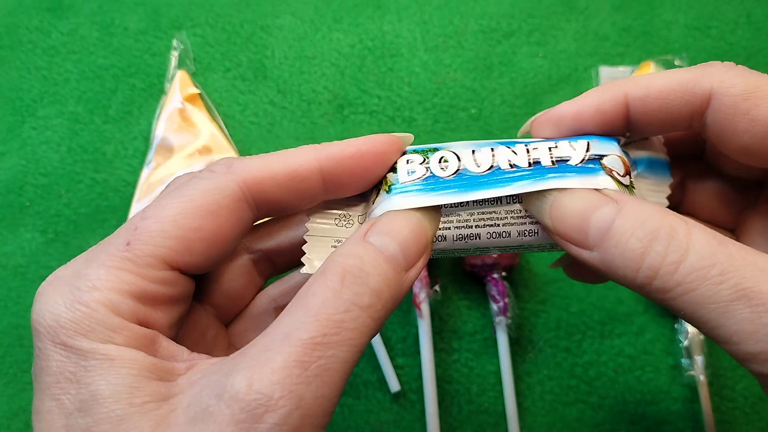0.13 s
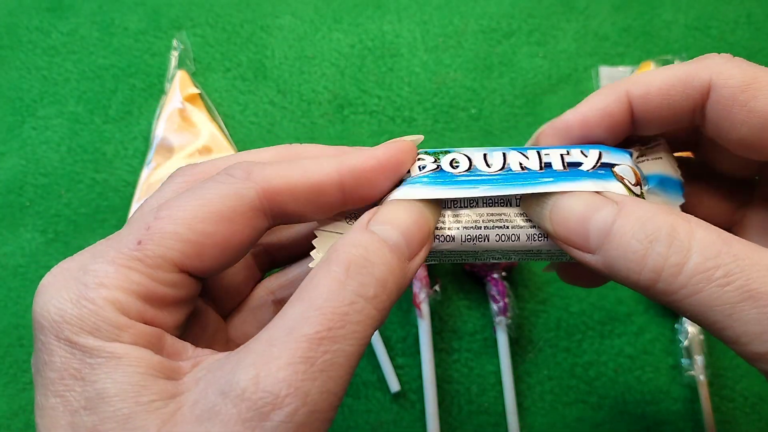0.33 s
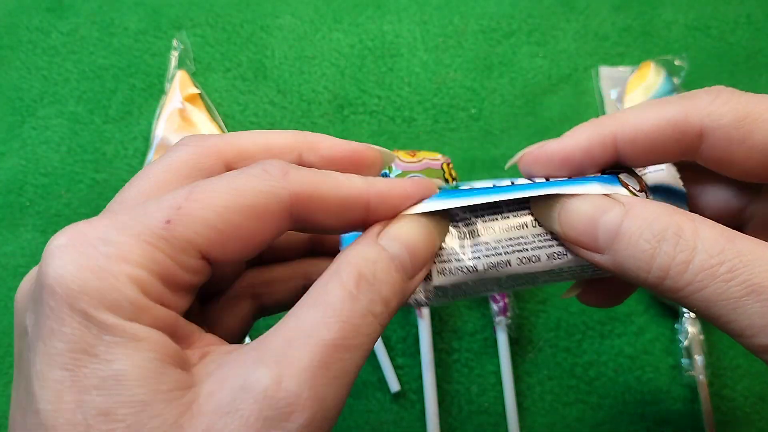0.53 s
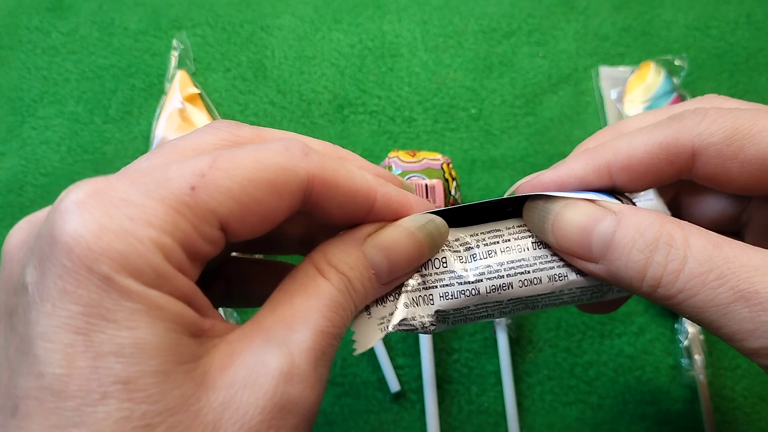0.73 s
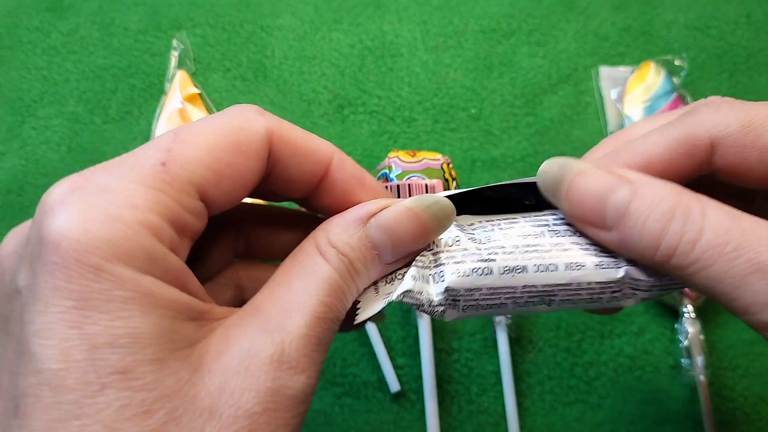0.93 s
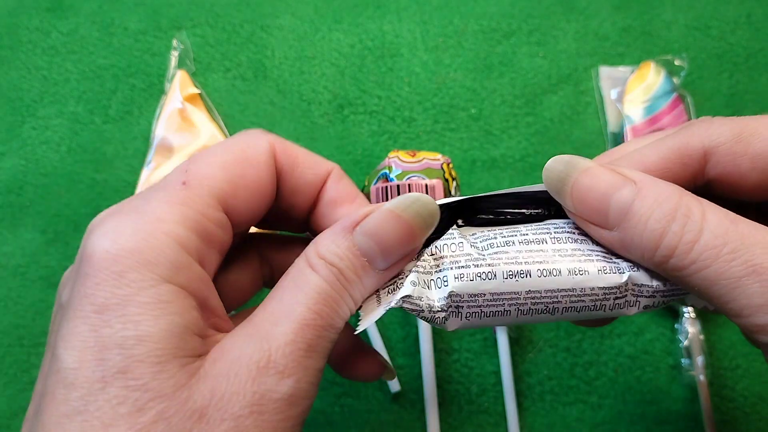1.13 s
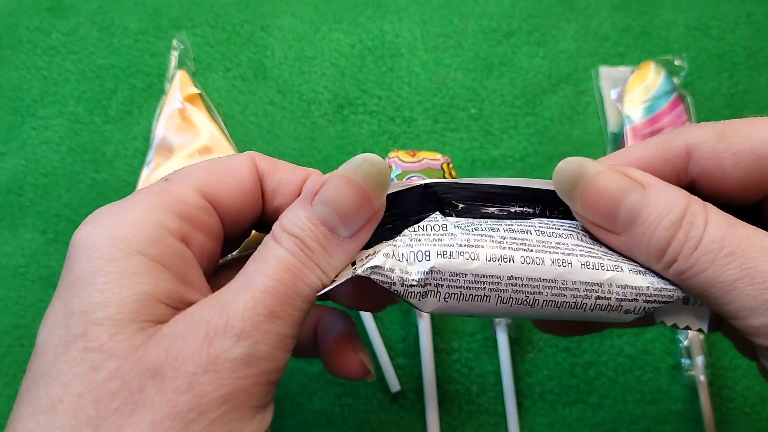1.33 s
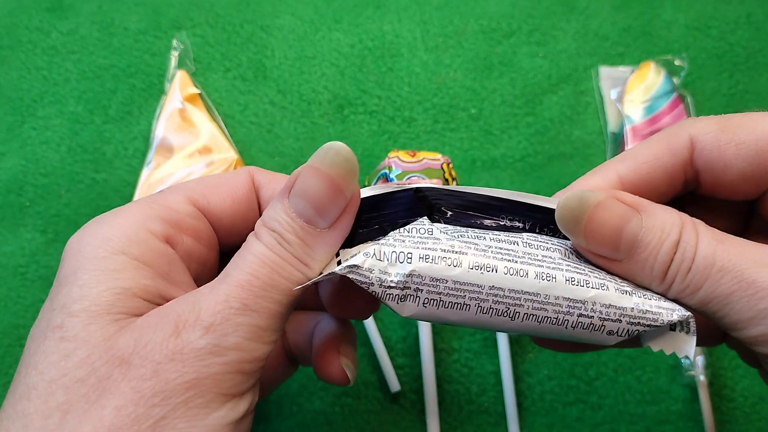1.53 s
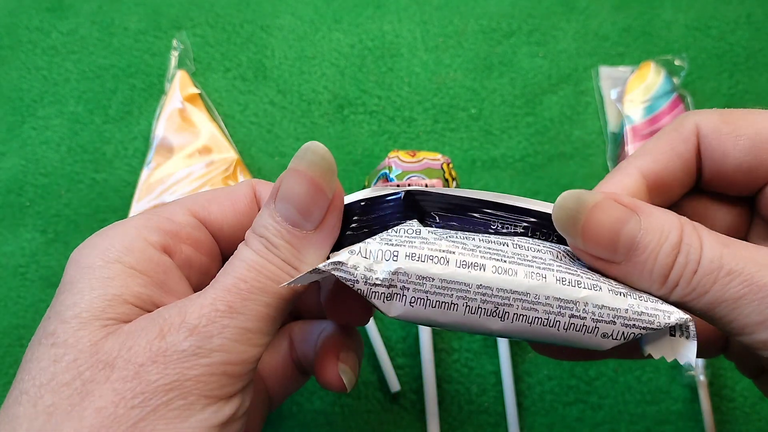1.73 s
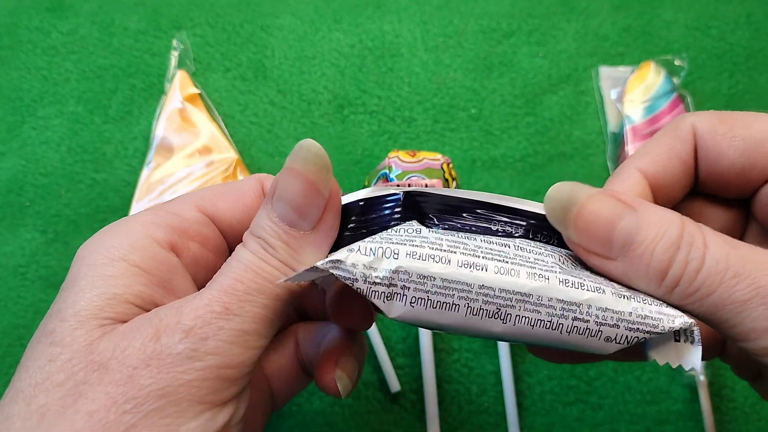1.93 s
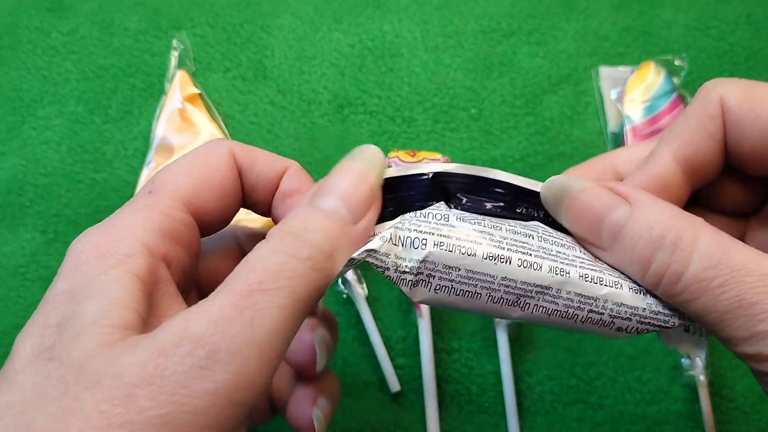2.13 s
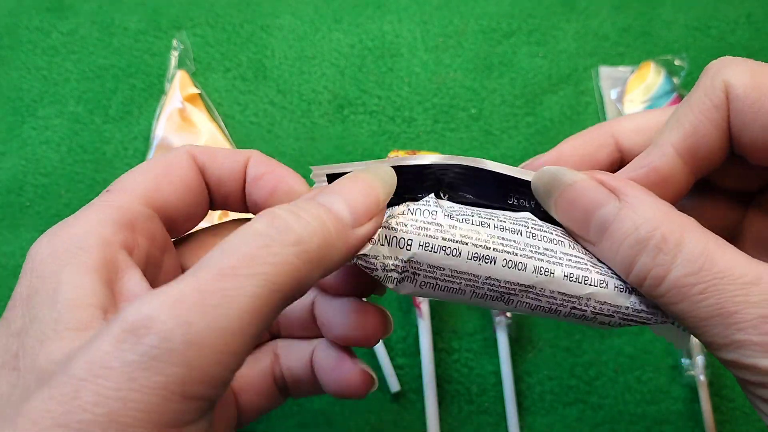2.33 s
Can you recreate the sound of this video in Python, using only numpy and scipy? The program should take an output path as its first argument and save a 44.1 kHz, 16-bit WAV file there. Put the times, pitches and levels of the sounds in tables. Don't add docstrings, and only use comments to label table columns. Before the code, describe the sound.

Close stereo crinkling of a plastic sweet wrapper: scattered crisp clicks, a thick burst of bright crackles, looser smoothing snaps, a short lull, then renewed rustling with dull film knocks, in a quiet, barely reverberant room.

```python
import sys
import numpy as np
from scipy import signal
from scipy.fft import rfft, irfft, next_fast_len
from scipy.io import wavfile
from scipy.ndimage import uniform_filter1d

SR = 44100
rng = np.random.default_rng(int(sys.argv[2]) if len(sys.argv) > 2 else 0)


def invert_db(level):
    return 10 ** (np.asarray(level, dtype=float) / 20)


def pcm_store(signal):
    levels = np.round(np.clip(np.atleast_2d(signal), -1, 1) * 32767)
    wavfile.write(sys.argv[1], SR, levels.astype(np.int16).T)


N = 110250
TIME_S = np.arange(N) / SR
SIDE = np.array([[0.5], [-0.5]])


def at_hz(points, hz):
    table_hz, table_db = np.transpose(points)
    return np.interp(np.log(hz + 1), np.log(table_hz), table_db)


def rms_one(x):
    return x / np.sqrt(np.mean(x ** 2) + 1e-20)


def drift(rate_hz):
    r = np.exp(-2 * np.pi * rate_hz / SR)
    wander = signal.lfilter([1], [1, -2 * r, r * r], rng.standard_normal(N + SR))
    return rms_one(wander[SR:])


HUM_HZ, HUM_DB, HUM_PAN_DB, HUM_WOBBLE_DB = 100, -82.5, 6, 1
HUM_SINKS_S, SINK_DB = 1.75, -3.5


def mains_hum():
    level_db = HUM_DB + SINK_DB * (TIME_S > HUM_SINKS_S) + HUM_WOBBLE_DB * drift(11.0)
    hum = np.sqrt(2) * np.sin(2 * np.pi * HUM_HZ * TIME_S) * invert_db(level_db)
    return invert_db(HUM_PAN_DB * SIDE) * hum


# (frequency [Hz], level [dB per Hz])
HISS_COLOUR = [(25, 3.5), (60, 0.5), (200, 9), (450, 6.5), (900, 4.5), (2900, -36), (7000, 2), (12000, -29)]
HISS_DB, HISS_PAN_DB = -81, 1
LULL_S, LULL_HALF_S = 1.88, 0.13


def hiss():
    colour = invert_db(at_hz(HISS_COLOUR, np.fft.rfftfreq(N, 1 / SR)))
    noise = irfft(rfft(rng.standard_normal((2, N))) * colour, N)
    lull = np.abs(TIME_S - LULL_S) < LULL_HALF_S
    return invert_db(HISS_DB + SINK_DB * lull + HISS_PAN_DB * SIDE) * rms_one(noise)


# (frequency [Hz], lift [dB])
HOLLOW_LIFTS = [(1150, 3), (1800, 4), (2550, 6), (4000, 6.5), (5800, 2.5), (7050, 3.5)]
# (frequency [Hz], level [dB])
LEFT_COLOUR = [(600, -19.5), (850, -10), (2600, -2), (4500, 0), (7000, -1.5), (9000, -13.5), (10000, -21.5),
               (16000, -30)]
# (frequency [Hz], level [dB])
RIGHT_COLOUR = [(600, -17.5), (850, -6), (2600, 0), (5500, 6), (7100, 9), (8800, -9.5), (10500, -26.5),
                (15300, -20)]
HOLLOW_WIDTH_HZ = 180


def microphones(size):
    hz = np.fft.rfftfreq(size, 1 / SR)
    lift = sum(db / (1 + ((hz - centre_hz) / HOLLOW_WIDTH_HZ) ** 2) for centre_hz, db in HOLLOW_LIFTS)
    spectra = []
    for colour in (LEFT_COLOUR, RIGHT_COLOUR):
        cepstrum = irfft(np.log(invert_db(at_hz(colour, hz) + lift)), size)
        cepstrum[1:size // 2] *= 2
        cepstrum[size // 2 + 1:] = 0
        spectra.append(np.exp(rfft(cepstrum)))
    return np.array(spectra)


# (time [s], level [dB])
FINGER_PRESSURE = [(0, -65), (0.272, -61), (.36, -78.5), (.43, -70), (.52, -64), (.7, -56.5), (1.0, -56.5),
                   (1.121, -67.5), (1.25, -63.5), (1.48, -54.5), (1.56, -65.5), (1.82, -75.5), (1.98, -93),
                   (2.081, -60.5), (2.179, -47.5), (2.29, -61.5), (2.379, -58), (2.439, -65)]
CRACKLES_PER_S, CRACKLE_SPREAD_DB, CRACKLE_CYCLES = 4000, 3.8, 3.7
RUSTLE_DB, CLUMP_DB = -2, 3


def rustle(count=16):
    s, db = np.transpose(FINGER_PRESSURE)
    sizes_db = CRACKLE_SPREAD_DB * np.minimum(rng.exponential(1, N), 5)
    sizes = invert_db(sizes_db) * rng.choice([-1, 1], N)
    born = rng.random(N) < CRACKLES_PER_S * invert_db(CLUMP_DB * drift(25)) / SR
    pitch_number = rng.integers(0, count, N)
    out = np.zeros((2, N))
    for k, hz in enumerate(np.geomspace(900, 15000, count)):
        r = invert_db(-60 * hz / CRACKLE_CYCLES / SR)
        w = 2 * np.pi * hz / SR
        clicks = sizes * born * (pitch_number == k) + 1e-18
        ring = signal.lfilter([1, 0, -1], [1, -2 * r * np.cos(w), r * r], clicks)
        lag = rng.integers(-20, 20)
        out += np.array([ring, np.roll(ring, lag)]) * np.sqrt(hz / 4000)
    size = next_fast_len(N + 2048)
    out = irfft(rfft(out, size) * microphones(size), size)[:, :N]
    return rms_one(out) * invert_db(np.interp(TIME_S, s, db) + RUSTLE_DB)


SLIP_RISE_S, SLIP_FALL_S, LEAD_CLICK_DB = 0.00045, 0.00045, 4
SNAP_ALIKE, EVEN_FLOOR = 0.68, 0.11
PAN_SPREAD_DB, LAG_SPREAD_S = 1.5, 0.00015
RING_Q, BRIGHT_HZ = 4.6, 6214


def slip_bursts(count, slower, size):
    t = np.arange(size) / SR - 0.004
    shape = np.where(t < 0, np.exp(t / SLIP_RISE_S / slower), np.exp(-t / SLIP_FALL_S / slower))
    click = invert_db(LEAD_CLICK_DB) * (np.abs(t) == np.abs(t).min())
    slips = rng.standard_normal((count, 2, 3, size)) * shape
    slips += click * rng.choice([-1, 1], (count, 2, 1, 1))
    shared, own = slips[:, :, :1], slips[:, :, 1:]
    burst = rfft(np.sqrt(SNAP_ALIKE) * shared + np.sqrt(1 - SNAP_ALIKE) * own)
    strength = np.abs(burst) ** 2
    burst = burst / np.sqrt(strength + EVEN_FLOOR * strength.mean(axis=-1, keepdims=True))
    return rfft(irfft(burst, size) * np.sqrt(shape))


def snaps(rows, skirt_db, slower=1, size=1024):
    s, db, ring_hz, bright_db = np.transpose(rows)
    hz = np.fft.rfftfreq(size, 1 / SR)
    bursts = slip_bursts(len(s), slower, size)
    pan, lag = rng.standard_normal((2, len(s), 1, 1))
    place = invert_db(PAN_SPREAD_DB * pan * SIDE) * np.exp(-2j * np.pi * hz * LAG_SPREAD_S * lag * SIDE)
    u = 1j * hz / ring_hz[:, None, None]
    v = 1j * hz / BRIGHT_HZ
    body = u / RING_Q / (1 + u / RING_Q + u * u)
    skirt = invert_db(skirt_db) * (1.5 * u / (1 + 1.5 * u)) ** 3
    ring = (body + skirt) / (1 + 1.9 * v + v * v) ** 2
    edge = (v * v / (1 + 1.455 * v + v * v)) ** 2
    out = np.zeros((2, N + size))
    for part, colour, level_db in ((0, ring, db), (1, edge, db + bright_db)):
        x = irfft(bursts[:, part] * colour * place * microphones(size), size)
        power = uniform_filter1d(np.mean(x ** 2, axis=1), size=33)
        x = x * (invert_db(level_db + 0.5) / np.sqrt(power.max(axis=1)))[:, None, None]
        starts = np.maximum(s * SR - power.argmax(axis=1), 0).astype(int)
        for start, one in zip(starts, x):
            out[:, start:start + size] += one
    return out[:, :N]


# (time [s], body ring level [dB], ring
# pitch [Hz], bright part above the ring [dB])
CREASES = [(0.0064, -49.5, 3300, -18), (0.0108, -40.5, 4200, 0), (0.0216, -51, 5600, -6),
           (0.0275, -52, 2250, -11), (0.041, -73, 4130, -17), (0.066, -61, 4160, -9),
           (0.0827, -50.5, 4300, 3.5), (0.0917, -64, 5790, 1), (0.1019, -56, 5920, -12),
           (0.1175, -32.5, 5790, -7.5), (0.1586, -69, 5840, 7), (0.1752, -36, 6160, 7),
           (0.1817, -85, 5900, -9), (0.1965, -54, 2480, -14), (0.2113, -70, 5700, -3),
           (0.2247, -67, 5860, 10), (0.2475, -48, 5830, 3), (0.272, -42, 5700, -10),
           (0.2901, -35.5, 2460, 2), (0.3801, -28, 6010, -7), (0.3852, -47, 4070, -18),
           (0.3884, -45, 6100, 0), (0.3995, -40, 3130, -13), (0.405, -54, 5900, 5),
           (0.4171, -28, 3330, -12), (0.425, -37.5, 2413, 8), (0.4301, -26.5, 5640, -7),
           (0.4339, -38.5, 2690, -1), (0.4424, -32, 4540, -16), (0.4502, -42, 4130, -8),
           (0.4554, -32, 3300, -24), (0.4598, -39, 2700, 0), (0.4743, -43, 5440, -7),
           (0.4936, -49, 3030, -6), (0.5097, -53, 2730, -12), (0.5404, -33, 6000, -1),
           (0.5581, -46, 5740, -14), (0.5671, -42.5, 5160, -4.5), (0.5723, -53, 5050, -7),
           (0.583, -44.5, 5400, 3), (0.586, -43.5, 2650, 2),
           (0.6041, -25, 6440, -12), (0.615, -45, 5160, -8), (0.6238, -41, 5670, -6),
            (0.6345, -40, 5680, -4), (0.6456, -33.5, 6020, -3), (0.659, -25, 5360, -5.5),
            (0.6654, -30.5, 5670, -11), (0.6834, -22.5, 5450, -5.5), (0.6966, -38, 5410, -9.5),
            (0.704, -21.5, 5440, -14), (0.713, -51, 5000, -17), (0.7321, -26.5, 6180, 4.5),
            (0.7354, -44, 5960, 3), (0.739, -36, 1637, -11), (0.793, -39.5, 3060, 2),
            (0.802, -47, 6000, 0.5), (0.8203, -43.5, 2990, 4), (0.8548, -45.5, 5170, -3.5),
            (0.8744, -38, 3200, -8), (0.8807, -38.5, 4070, 3.5), (0.896, -44, 5020, -11.5),
            (0.9159, -51, 5800, 1), (0.9231, -27, 2840, 6), (0.9528, -38.5, 4250, 4.5),
            (1.0049, -45, 5940, 0.5), (1.01, -37, 5350, -3.5), (1.0272, -25, 3720, -9.5),
            (1.05, -26.5, 3417, -22), (1.0537, -27.5, 4000, 0.5), (1.0623, -36, 2500, -5),
            (1.142, -45.5, 3998, -8.5), (1.1683, -52, 1430, -6.5), (1.1863, -44.5, 2260, -2.5),
            (1.2318, -58, 6000, -1.5),
           (1.2622, -56, 2530, -11), (1.2695, -51, 3800, -20), (1.3065, -52, 1750, -19),
             (1.3191, -37, 2600, -2), (1.3225, -35, 2720, -1.5), (1.3349, -27, 3040, -4.5),
             (1.3428, -52, 2710, -8), (1.3632, -37, 2450, -16), (1.3787, -38.5, 4180, -1),
             (1.387, -31, 2645, -3.5), (1.4327, -38, 4350, -1.5), (1.4554, -42, 2320, -27),
             (1.4608, -36, 2680, -36), (1.4864, -36, 2410, -8), (1.4893, -43.5, 5900, 3),
             (1.5151, -53, 3260, -8), (1.5766, -49.5, 3400, -2), (1.5866, -58, 5430, 1),
             (1.6069, -44, 3250, -8), (1.6177, -27, 2640, -6), (1.6533, -34, 3200, -2.5),
             (1.7, -33.5, 3270, -1.5), (1.8279, -65, 4430, -11.5), (1.8502, -71.5, 6080, 11),
             (1.8928, -51.5, 6090, 5.5), (2.0093, -42, 2660, 1), (2.0156, -38, 2890, -1),
             (2.0219, -38, 5720, 3.5), (2.0356, -44.5, 5340, -8.5), (2.095, -55, 5920, 1),
             (2.0998, -46.5, 5940, -3.5), (2.1362, -30.5, 2650, -12), (2.1452, -41, 2630, 1),
             (2.1656, -47, 1390, -13), (2.1993, -37, 1400, 5.5), (2.2286, -38, 2670, 4),
             (2.2318, -46, 5000, 3), (2.3185, -63, 1550, 2), (2.371, -65, 4200, 14.5),
             (2.457, -52, 6200, 0), (2.4787, -38, 5930, -4),
           (0.7322, -34, 1750, -12),
    (0.9238, -29, 1800, -12),
    (1.0568, -42, 2600, 0),
    (1.3171, -37, 4000, -2),
    (1.3845, -37, 4000, -4),
    (1.388, -32, 1750, -12),
    (2.1352, -33, 3400, -15),
    (2.1375, -35, 5500, -3),
]


def crease_snaps():
    return snaps(CREASES, skirt_db=-10)


NEAR_DB, NEAR_T60_S = -13, 0.014
ROOM_DB, ROOM_T60_S, ROOM_TOP_T60_S, ROOM_SPLIT_HZ, ROOM_GAP_S = -10.5, 0.15, 0.15, 8600, 0.00068


def room(x):
    t = np.arange(SR) / SR
    tail_noise, near_noise = rng.standard_normal((2, 2, SR))
    low = signal.sosfilt(signal.butter(2, ROOM_SPLIT_HZ, fs=SR, output="sos"), tail_noise)
    tail = low * invert_db(-60 * t / ROOM_T60_S) + (tail_noise - low) * invert_db(-60 * t / ROOM_TOP_T60_S)
    tail = tail * (1 - np.exp(-t / ROOM_GAP_S))
    near = near_noise * invert_db(-60 * t / NEAR_T60_S) * (t > 0.001)
    answer = (invert_db(ROOM_DB) * rms_one(tail) + invert_db(NEAR_DB) * rms_one(near)) / np.sqrt(SR)
    return signal.fftconvolve(x, answer, axes=1)[:, :N]


# (time [s], level [dB])
PANEL_KNOCKS = [(0.0664, -58), (0.2898, -49.5), (0.4176, -44), (.654, -43), (.658, -43), (0.6854, -36),
                (.7043, -41.5), (0.7425, -48.5), (.7932, -54), (0.8744, -53), (0.9237, -43), (1.0506, -48),
                (1.0619, -41.5), (1.1678, -49), (1.1861, -47.5), (1.3631, -47.5), (2.021, -50.5),
                (2.1656, -43.5), (2.172, -44), (2.179, -51), (2.187, -44.5), (2.201, -37.5), (2.2127, -37),
                (2.233, -47), (2.264, -52.5), (2.27, -49), (2.277, -55), (2.495, -57.5)]
PANEL_HZ, PANEL_SPREAD = 1037, 0.06


def knocks():
    rows = []
    for s, db in PANEL_KNOCKS:
        rows.append((s, db, PANEL_HZ * np.exp(PANEL_SPREAD * rng.standard_normal()), -30))
    return snaps(rows, skirt_db=-37, slower=2.5)


# (time [s], peak level [dB], microphone [0 left, 1 right])
AIR_PUFFS = [
    (0.1171, -33.5, 0),
    (0.1752, -37.5, 0),
    (0.6057, -30.5, 1),
    (0.7308, -24.5, 0),
    (0.9234, -32.5, 0),
    (1.4901, -41.5, 0),
    (2.0218, -36.5, 0),
    (2.2286, -26, 0),
]
PUFF_CUT_HZ, PUFF_LOW_HZ = 5540, 105


def puffs():
    out = np.zeros((2, N)) + 1e-18
    for s, db, mic in AIR_PUFFS:
        out[int(round(mic)), int(s * SR) - 8] = -invert_db(db + 21)
    out = signal.lfilter(*signal.butter(2, PUFF_CUT_HZ, fs=SR), out)
    return signal.lfilter(*signal.butter(2, PUFF_LOW_HZ, "high", fs=SR), out)


def scene():
    film = rustle() + crease_snaps() + knocks()
    return film + room(film) + puffs() + mains_hum() + hiss()


def roll_off(x):
    return signal.sosfilt(signal.butter(12, 16980, fs=SR, output="sos"), x)


def record(dry):
    top_cut = signal.cheby2(12, 60, 16400 + 500, fs=SR, output="sos")
    mix = signal.sosfilt(top_cut, dry)
    return roll_off(mix)


dry = scene()
out = record(dry)
pcm_store(out)
```